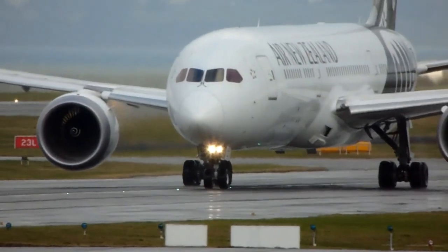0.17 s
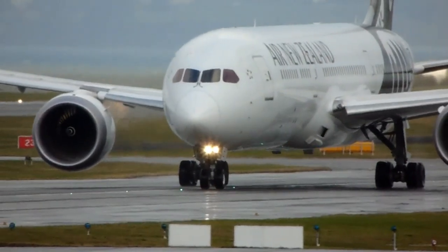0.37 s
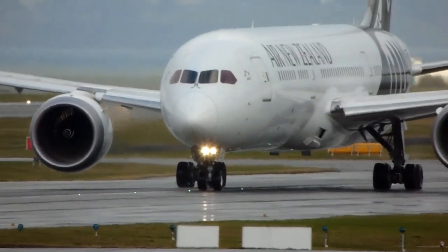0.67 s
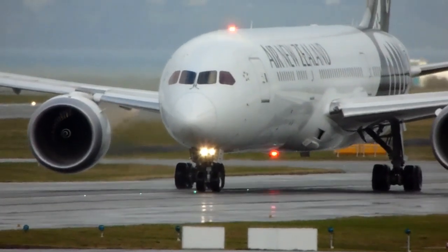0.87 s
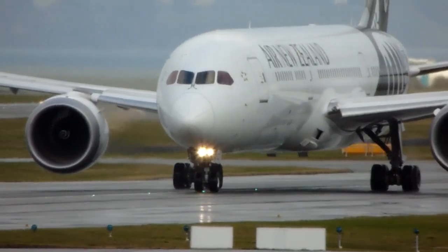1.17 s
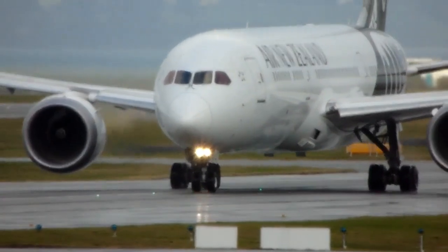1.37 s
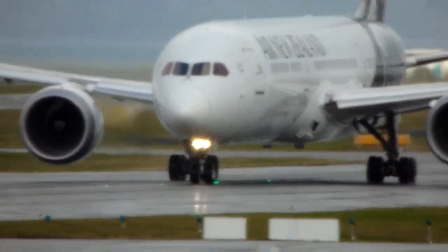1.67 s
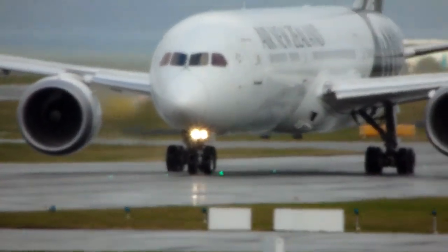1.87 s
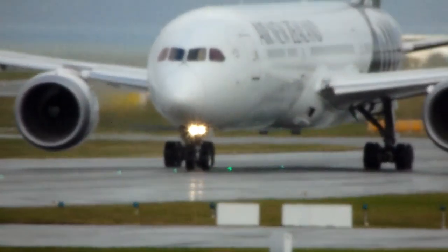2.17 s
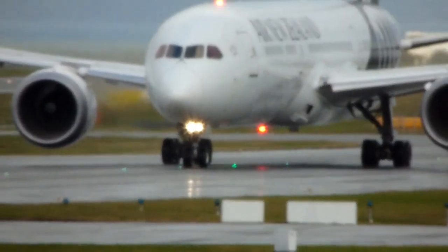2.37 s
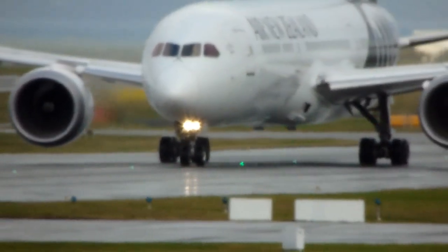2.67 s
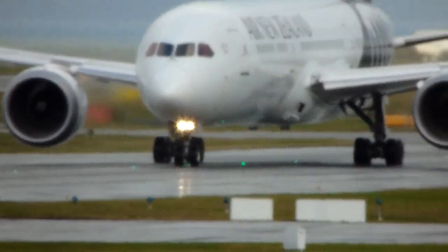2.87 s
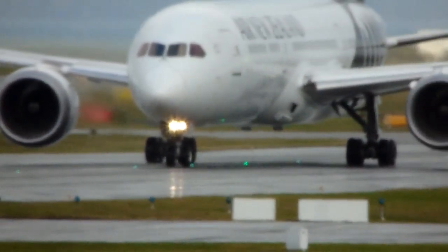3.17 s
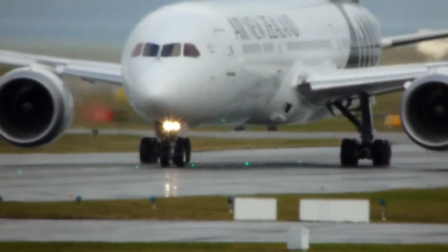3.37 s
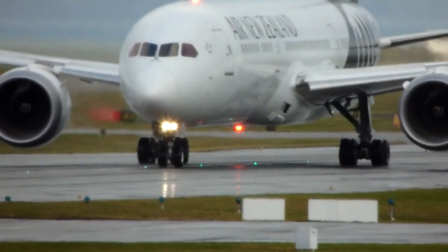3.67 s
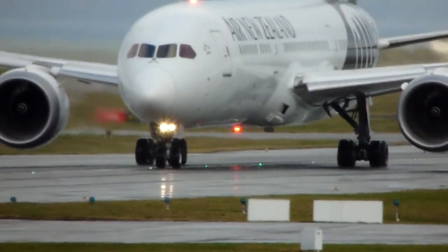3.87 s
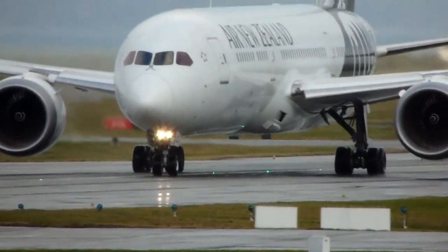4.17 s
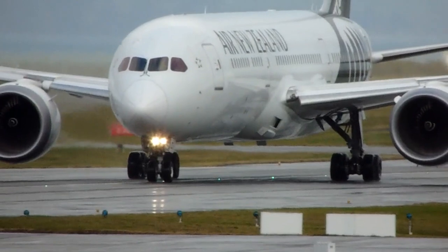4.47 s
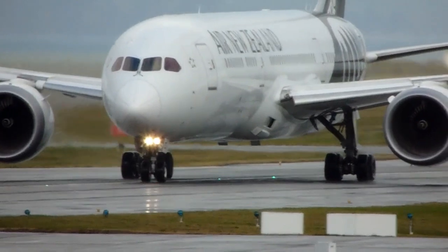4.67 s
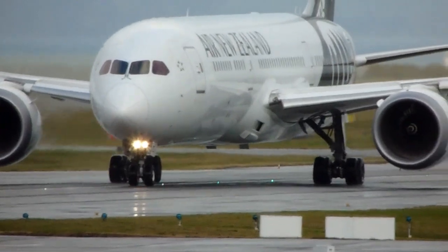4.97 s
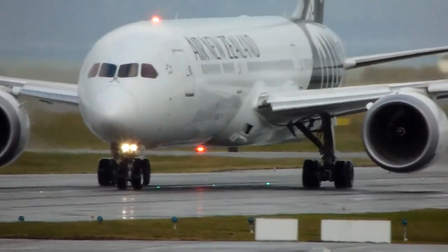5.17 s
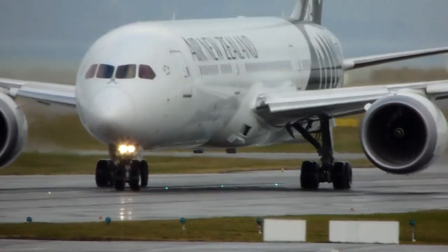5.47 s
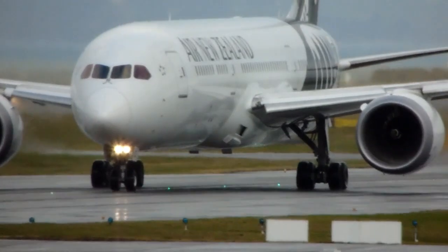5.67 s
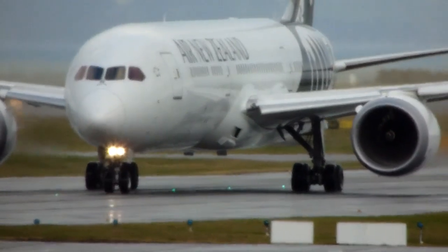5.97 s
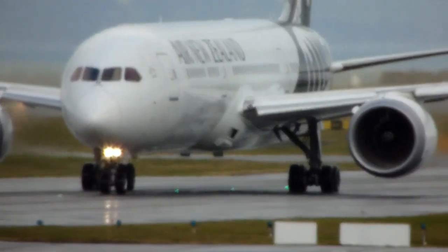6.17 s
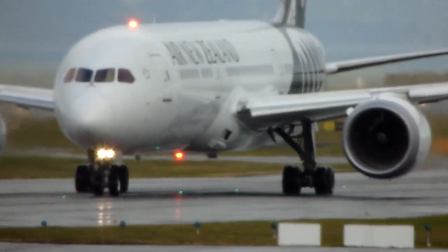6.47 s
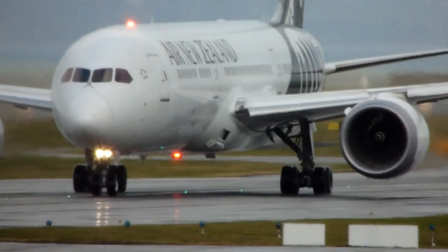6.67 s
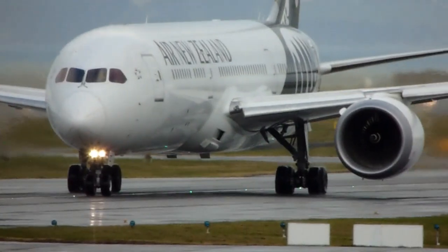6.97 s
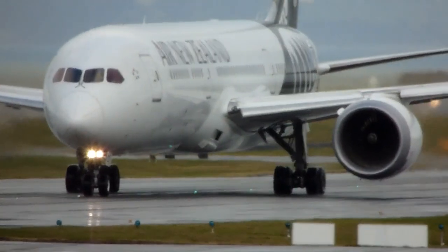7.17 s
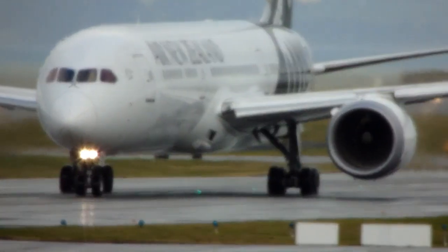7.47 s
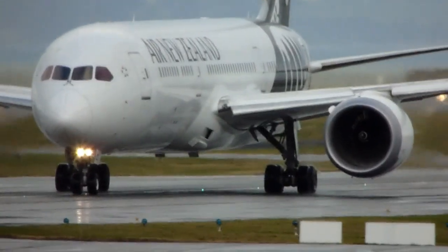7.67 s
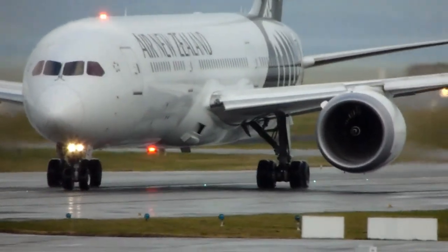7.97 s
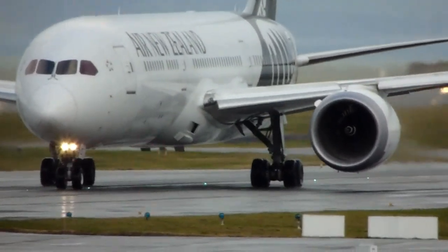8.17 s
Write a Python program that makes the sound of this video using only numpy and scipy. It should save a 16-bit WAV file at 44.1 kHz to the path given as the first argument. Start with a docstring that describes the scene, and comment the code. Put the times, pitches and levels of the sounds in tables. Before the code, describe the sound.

Airliner engines rush by in a fluttering hiss that peaks sharply, drops to a duller whining roar, and rises again amid dull wind thumps.

```python
"""A twin-engined airliner taxis past on a wet apron, heard in mono from the grass beside it.
First the nearer-turning intake swings through the line of sight: beamed noise swells from hiss to bright sizzle.
Then the second engine takes over with a lower, rasping whine: the same noise with other resonances and lobes.
Throughout, filtered noise makes the exhaust roar, a thin wash and a low breeze, while gusts and eddies
thump on the microphone, hardest in the middle and near the end."""
import sys
import numpy as np
from scipy import signal
from scipy.fft import rfft, irfft
from scipy.io import wavfile
from scipy.ndimage import uniform_filter1d, map_coordinates

SR = 44100
rng = np.random.default_rng(int(sys.argv[2]) if len(sys.argv) > 2 else 0)


def store_pcm(level_fs):
    """Save levels as 16-bit WAV."""
    pcm = np.round(np.clip(level_fs, -1, 1) * 32767).astype(np.int16)
    wavfile.write(sys.argv[1], SR, np.atleast_2d(pcm).T)


N = 367794
TIME = np.arange(N) / SR
FREQS = np.maximum(np.fft.rfftfreq(N, 1 / SR), 1)

# noise beamed out of the intakes, before flutter: (t/s, hiss level/dB, sizzle level/dB, top fizz level/dB)
INTAKE_BEAM = [(0.0, -39.5, -47.5, -62), (0.2, -36.5, -45, -60.5), (0.6, -35, -43.5, -56),
               (0.85, -31, -39, -51), (1.1, -32.5, -38, -53), (1.6, -30, -38.5, -47),
               (2.2, -28.5, -30, -41), (2.75, -30.5, -25, -36.5), (2.9, -30.5, -20.5, -32),
               (3.06, -31, -25, -30), (3.3, -37, -36.5, -46), (3.65, -39, -41, -49),
               (3.95, -43, -48.5, -59), (4.3, -42, -53.5, -74), (4.65, -43, -53, -76),
               (5.1, -42.5, -50.5, -75), (6.1, -41.5, -49, -70), (7.1, -38, -44.5, -62),
               (7.7, -35.5, -41, -58), (8.34, -37.5, -39, -56)]
LEAN_DB, LEAN_FOLLOWS = 0.33, 0.12   # brightness of the hiss: dB at the mean sizzle level; dB per dB of sizzle


def intake(air, scintillation_db, twinkle_db):
    """Short waves leave the intake in a narrow beam, so they swell and flutter most."""
    hiss_db, sizzle_db, fizz_db = in_time(INTAKE_BEAM)
    flutter_db = scintillation_db * drift(34) + twinkle_db * drift(3.1)

    # the dull and the bright half of the hiss trade places with the angle
    lean = from_db(LEAN_DB + LEAN_FOLLOWS * (sizzle_db - sizzle_db.mean()))
    dull = register(air, 3440, 4360)
    bright = register(air, 4690, 7030)
    hiss = (dull / lean + bright * lean) / np.sqrt(lean ** 2 + lean ** -2)

    hiss = wavering(hiss, hiss_db + 0.27 * flutter_db, flutter_db=0.85)
    sizzle = wavering(register(air, 6540, 10870), sizzle_db + flutter_db, flutter_db=0.22)
    fizz = wavering(register(air, 11500, 17000), fizz_db + flutter_db, flutter_db=1.0)
    return hiss + sizzle + fizz


# the fans' three registers as the aircraft turns past, before flutter:
# (t/s, low moan level/dB, whine level/dB, blade rasp level/dB)
FAN_REGISTERS = [(0.0, -41.5, -43, -38), (0.25, -40, -41, -39.5), (1.16, -40, -38.5, -40),
                 (1.62, -40.5, -40.5, -39), (2.14, -39, -39.5, -39.5), (2.95, -37.5, -38, -40),
                 (3.41, -38.5, -37, -41), (3.85, -39, -42.5, -46.5), (4.23, -40.5, -40, -41.5),
                 (4.7, -42, -46, -47), (4.98, -41.5, -43, -45.5), (5.6, -41.5, -44.3, -45.5),
                 (6.1, -41.5, -36, -44), (6.74, -41, -39, -38), (6.85, -40.5, -35.5, -37),
                 (8.2, -41, -34.5, -34.6), (8.34, -42, -32, -34)]
ROAR_DB, ROAR_FOLLOWS = -45.5, 1   # roar at the moan's mean level; share of the moan's swing it takes on


def fan_and_exhaust(air):
    """The dull jet roar under the fan's moan, whine and rasp, each a register of the engine noise."""
    moan_db, whine_db, rasp_db = in_time(FAN_REGISTERS)
    roar_db = ROAR_DB + ROAR_FOLLOWS * (moan_db - moan_db.mean())
    roar = wavering(register(air, 93, 734), roar_db, flutter_db=0.2)
    moan = wavering(register(air, 723, 1500), moan_db, flutter_db=0.55)
    whine = wavering(register(air, 1483, 2240), whine_db, flutter_db=1.0)
    rasp = wavering(register(air, 2364, 3256), rasp_db, flutter_db=0.95)
    return roar + moan + whine + rasp


# overall tilt of the engine noise, before its registers are levelled: (f/Hz, relative level/dB per Hz)
ENGINE_TILT = [(120, -1), (260, -4.5), (550, -0.5), (750, 0.5), (900, 4), (1400, 1), (1950, 6.5),
               (3100, 6.5), (4500, 5.5), (6500, -3), (9500, 0.5), (11000, -2), (14150, -15), (14400, -33)]


def engine_noise():
    """Turbulence from both engines, beamed through moving air and given its overall tilt; rms 1."""
    air = both_engines(handover_s=4.06, handover_length_s=0.65)
    return coloured(through_lobes(air), ENGINE_TILT)


# duct resonances, narrow peaks and hollows of each engine: (f/Hz, width/Hz, level/dB)
FIRST_DUCT = [(1200, 40, -1.5), (1257, 50, 3), (1600, 69, 1.5), (1760, 120, -1), (2840, 90, 2.5),
              (3360, 120, 3), (4360, 130, 3.5), (4770, 200, 2), (5470, 120, 2), (6930, 140, -4),
              (7160, 110, 2), (8100, 170, 4), (10750, 150, 0.5), (11900, 150, 2), (13000, 870, 1.5)]
SECOND_DUCT = [(835, 95, 4.5), (1255, 29, 1.5), (1480, 240, -0.5), (1606, 67, 1.5), (1907, 79, 5.5),
               (2200, 95, 0), (2640, 52, 3), (2886, 61, 4.5), (3670, 200, 3), (4040, 190, 1.5),
               (4480, 150, 5), (5300, 130, -3.5), (7000, 150, -4), (7300, 130, 1.5), (7460, 100, -7),
               (9940, 620, -0.5)]
# short echoes off cowling and wet ground that comb each engine's sound: (delay/s, signed gain)
FIRST_ECHOES = [(.0011, 0.01), (.001889, -0.025)]
SECOND_ECHOES = [(.001128, -0.11), (.001788, 0.092)]


def both_engines(handover_s, handover_length_s):
    """The second engine takes over as the first turns away, in an equal-power crossfade."""
    first = engine_air(FIRST_DUCT, FIRST_ECHOES, middle_s=1.6, sink_per_s=.007)
    second = engine_air(SECOND_DUCT, SECOND_ECHOES, middle_s=6.8, sink_per_s=.007)
    share = .5 + .5 * np.tanh((TIME - handover_s) / handover_length_s)
    return np.sqrt(1 - share) * first + np.sqrt(share) * second


# scatter off the airframe: spread in time, strength beside the direct sound
SCATTER_S, SCATTER_SHARE = .009, .18


def engine_air(modes, echoes, middle_s, sink_per_s):
    """Turbulence through duct resonances, echoes and airframe scatter; its pitch sinks slowly in passing."""
    shape_db = sum(db * np.exp(-2 * ((FREQS - hz) / width) ** 2) for hz, width, db in modes)
    comb = 1 + sum(gain * np.exp(-2j * np.pi * FREQS * delay) for delay, gain in echoes)

    # scatter builds up, then dies away; it is weaker below 3 kHz
    swell = (TIME / SCATTER_S) * np.exp(-np.minimum(2 * TIME / SCATTER_S, 20))
    scatter = rng.standard_normal(N) * swell
    scatter = scatter / np.linalg.norm(scatter)
    comb = comb + SCATTER_SHARE * rfft(scatter) * np.minimum(FREQS / 3000, 1)

    # twice the sample rate, so that the changing read speed stays clean
    fine = irfft(rfft(rng.standard_normal(N)) * from_db(shape_db) * comb, 2 * N)
    doppler = 1 - sink_per_s * (TIME - middle_s)
    return rms_one(map_coordinates(fine, [2 * np.cumsum(doppler)], order=3, mode="wrap"))


# lobes of each intake's beam, gliding in pitch as the angle changes: (t/s, centre f/Hz, lift level/dB)
FIRST_ROAR = [(1.0, 440, 1), (1.8, 410, 2.5), (2.5, 370, 3.2), (3.0, 360, 1.5)]
FIRST_MOAN = [(.3, 950, 1.7), (.8, 960, 2.5), (1.6, 990, 1), (2.2, 930, 0.91), (2.7, 900, 3.3),
              (3.2, 850, 2.1), (3.7, 825, 1.7)]
FIRST_HOWL = [(2.3, 1220, -1), (2.65, 1250, 4), (2.9, 1260, 5.5), (3.15, 1280, 5.5), (3.4, 1320, 4),
              (3.7, 1240, 2)]
FIRST_SWEEP = [(1.6, 2600, -2.5), (2.1, 2360, 7.5), (2.6, 2250, 2), (2.9, 1800, -1.5), (3.2, 1710, 4),
               (3.4, 1640, 6.5), (3.75, 1560, 1)]
FIRST_HISS = [(.7, 4200, 1), (1.3, 4270, 0.5), (2.2, 4700, -2.5), (2.38, 4800, 2), (3.0, 4430, -2)]
FIRST_WHISTLE = [(0, 9050, 1), (1.0, 9150, 3), (1.6, 9800, 5.6), (2.1, 11100, 6.4), (2.4, 11700, 3.3),
                 (3.1, 11000, 1), (3.65, 9960, 8), (4.0, 9900, 1.5)]
SECOND_WHINE = [(3.2, 2200, 1), (3.55, 2190, 6), (3.9, 2050, 3.5), (4.3, 2010, 4), (4.7, 1940, 3.5),
                (4.97, 1970, 6), (5.2, 2030, 4), (5.5, 1900, 2), (5.9, 1930, 0), (6.15, 2200, 2),
                (6.7, 2800, 2), (7.1, 2590, 3.5), (8.3, 2400, 0)]
SECOND_WHISTLE = [(3.9, 4140, -2), (4.25, 3850, 3), (4.55, 3930, 1), (4.9, 3550, 3), (5.5, 3800, 1),
                  (5.85, 4150, -3), (6.3, 4650, 4), (6.55, 4850, 3.5), (6.9, 4900, -4)]


def through_lobes(air):
    """As the aircraft rolls on, the lobes of its beams sweep past, and the moving air colours the noise."""
    hz, s, frames = signal.stft(air, SR, nperseg=2048)
    lift_db = lobe(FIRST_ROAR, hz, s, width=0.29, gap=.4)
    lift_db += lobe(FIRST_MOAN, hz, s, width=0.12, gap=0.36)
    lift_db += lobe(FIRST_HOWL, hz, s, width=0.12, gap=0.69)
    lift_db += lobe(FIRST_SWEEP, hz, s, width=0.068, gap=0.47)
    lift_db += lobe(FIRST_HISS, hz, s, width=0.22, gap=0.21)
    lift_db += lobe(FIRST_WHISTLE, hz, s, width=0.092, gap=0.28)
    lift_db += lobe(SECOND_WHINE, hz, s, width=0.058, gap=0.3)
    lift_db += lobe(SECOND_WHISTLE, hz, s, width=0.085, gap=0.67)
    lift_db += surges(hz, s) + shimmer(frames.shape, depth_db=1.3)
    return signal.istft(frames * from_db(lift_db), SR)[1][:N]


LOBE_FADE_S = .16   # a lobe dies away this fast beyond its path
LOBE_WANDER = 0.015   # the moving air shifts a lobe's centre by this share (rms)


def lobe(path, hz, s, width, gap):
    """Lift in dB of one gliding, wandering lobe with gaps on either side; width is a share of its centre."""
    times, centres, lifts = np.transpose(path)
    wander = 1 + LOBE_WANDER * np.interp(s, TIME, drift(5))
    centre = np.interp(s, times, centres) * wander
    present = np.exp(-((s - np.clip(s, times[0], times[-1])) / LOBE_FADE_S) ** 2)
    off = (hz[:, None] / centre - 1) / width
    profile = (1 - gap * off ** 2) * np.exp(-.5 * off ** 2)
    return present * np.interp(s, times, lifts) * profile


# the moving air carries parts of the beam over in short surges and fades:
# (t/s, level/dB, half length/s, centre f/Hz)
AIR_SURGES = [(.55, -1.5, .045, 9000), (0.696, 6, 0.045, 9500), (0.907, 11, 0.078, 9500),
              (0.922, 3, 0.11, 2800), (1.18, 2.5, .04, 4600), (1.35, 0.5, 0.056, 4600),
              (1.422, 3.5, 0.027, 12000), (1.617, 0, .035, 10000), (1.85, 5.5, 0.056, 8000),
              (2, -6.5, 0.065, 11000), (2.06, 2, 0.016, 2700), (2.213, -2, 0.025, 4000),
              (2.338, -2.5, .025, 9000), (2.482, 2.5, 0.053, 6750), (2.508, 2.5, 0.036, 13000),
              (2.668, -5.5, 0.013, 9100), (2.718, 3.5, 0.024, 9100), (2.85, 0.5, .04, 9500),
              (3, -2.5, 0.023, 10000), (3.062, 2, 0.022, 9000), (3.174, 2.5, 0.027, 1100),
              (3.36, 0, 0.042, 1700), (3.408, 3.5, 0.027, 6000), (3.54, -2, 0.043, 8000),
              (3.74, 1, 0.068, 10500), (4.102, 5, .07, 7000), (4.247, 3.5, 0.04, 4500),
              (4.515, 2, .05, 4500), (4.72, -2.5, 0.092, 4500), (4.98, 1, .06, 2000), (5.837, 4, .05, 4000),
              (5.92, 5.5, 0.04, 8000), (6.19, 0, .12, 2000), (6.3, -1.8, 0.055, 4000),
              (6.596, 4, 0.1, 8000), (6.6, 1, 0.093, 4200), (6.93, 3, 0.023, 8000),
              (7.056, -4.5, .045, 8000), (7.24, 1, 0.044, 4200), (7.505, 3, 0.052, 8200),
              (7.6, -2, 0.072, 2900), (7.68, 2, 0.037, 5330), (8.06, -2.5, .06, 5500),
              (8.247, 1.5, 0.033, 11000), (8.33, 4.5, 0.043, 4200)]
SURGE_OCTAVES = 0.46   # half width of a surge's reach in pitch


def surges(hz, s):
    """Lift in dB of the surges, each a smooth swell in time and in pitch."""
    octave = np.log2(np.maximum(hz, 1))[:, None]
    lift_db = 0
    for at, db, length, centre in AIR_SURGES:
        in_pitch = bump(octave, np.log2(centre), SURGE_OCTAVES)
        lift_db = lift_db + db * in_pitch * bump(s, at, length)
    return lift_db


def shimmer(shape, depth_db):
    """Paths through uneven air interfere: narrow bands brighten and fade by chance, more so in the treble."""
    field = rng.standard_normal(shape)
    for _ in range(2):
        field = uniform_filter1d(field, size=7, axis=0)    # across pitch
        field = uniform_filter1d(field, size=18, axis=1)   # across time
    return depth_db * rms_one(field) * np.linspace(.5, 2, shape[0])[:, None]


def wavering(sound, level_db, flutter_db):
    """Sound flutters in the moving air on its way."""
    return sound * from_db(level_db + flutter_db * drift(4.5))


# the strongest eddies that slap the microphone: (t/s, peak level/dB, pitch f/Hz)
MIC_EDDIES = [(.067, -23, 80), (0.099, -21.5, 70), (.508, -24.5, 130), (0.746, -30, 84), (2.436, -28, 137),
              (2.681, -29, 60), (3.681, -21, 216), (3.817, -27, 120), (3.837, -16.5, 100),
              (3.848, -11, 342), (3.854, -12, 230), (3.863, -16, 141), (3.878, -15, 175),
              (4.411, -23.5, 147), (4.611, -22.5, 245), (4.624, -21.5, 160), (4.649, -26, 110),
              (4.759, -22, 340), (4.763, -18, 160), (4.778, -24, 110), (4.802, -16.5, 100),
              (4.834, -23, 130), (4.85, -17.5, 270), (4.855, -12, 189), (4.863, -24, 170),
              (4.882, -16, 164), (4.897, -10.5, 76.5), (5.197, -20.5, 117), (7.573, -30, 200),
              (7.584, -21, 58), (7.615, -29, 70), (7.965, -26, 140), (7.99, -18, 105), (8.001, -23, 70),
              (8.021, -8, 161), (8.047, -19, 170)]
WAKE_S, WAKE_LOSS_DB = 0.01076, 16   # two weaker eddies follow: mean spacing; loss from one to the next
BODY_DB, BODY_PITCH_SHARE = -18, 0.46   # slower swirl round an eddy: level below its slap; share of its pitch


def thumps():
    """Each eddy pushes and pulls once inside a slower, lower swirl, then sheds weaker ones of scattered pitch."""
    out = np.zeros(N)
    chances = rng.uniform(.6, 1.4, (len(MIC_EDDIES), 2, 2))
    for (s, db, hz), chance in zip(MIC_EDDIES, chances):
        slaps = [(s, db, hz), (s, db + BODY_DB, hz * BODY_PITCH_SHARE)]
        for k, (late, size) in enumerate(chance, 1):
            slaps.append((s + k * WAKE_S * late, db - k * WAKE_LOSS_DB, hz * size))
        for at, peak_db, pitch in slaps:
            near = np.abs(TIME - at) < 2 / pitch
            passage = 2 * np.pi * pitch * (TIME[near] - at)
            slap = np.sin(passage) * np.exp(-.5 * (passage / 1.6) ** 2)
            out[near] += from_db(peak_db) * slap / slap.max()
    return out


# gusts that churn round the microphone, before the offsets below: (t/s, level/dB, half length/s)
MIC_GUSTS = [(0.1, -40, 0.024), (.5, -43, 0.026), (0.737, -41.5, .035), (1.615, -42, 0.022),
             (1.74, -41, .025), (2.05, -35, 0.053), (2.223, -38, 0.053), (2.426, -36, 0.047),
             (2.554, -44, 0.028), (2.68, -36, 0.048), (3.65, -38, 0.16), (3.848, -28, 0.035),
             (4.624, -40, 0.05), (4.772, -31.5, 0.031), (4.876, -31.5, 0.022), (5.21, -42, 0.033),
             (5.478, -44, 0.037), (5.634, -43, 0.034), (6.12, -42, 0.095), (7.21, -49, 0.023),
             (7.45, -40, 0.07), (7.593, -34.5, 0.037), (8.014, -29.5, 0.045)]
# spectra of the wind's sway and rumble: (f/Hz, relative level/dB per Hz)
SWAY_SPECTRUM = [(6, -3), (11, 2), (17, 4.5), (24, 3), (38, -14), (52, -4), (75, -37), (150, -51)]
RUMBLE_SPECTRUM = [(35, -32), (65, 1.5), (95, 1.5), (120, -1.5), (160, 2), (230, -7.5), (330, -9),
                   (600, -23)]
SWAY_DB, RUMBLE_DB = -43.5, -44   # steady breeze, before its lumps
GUST_SWAY_DB = 6.5   # added to a gust's level for its slow push
GUST_LENGTH_S, LONG_GUST_LOSS_DB = 0.022, 2   # usual half length; rumble lost per doubling of it


def wind(lumpy_db):
    """Pressure sways and rumbles at the microphone; gusts stir up both, and long ones mostly sway."""
    push = churn = 0
    for s, db, length in MIC_GUSTS:
        swell = bump(TIME, s, length)
        churn_db = db - LONG_GUST_LOSS_DB * np.log2(length / GUST_LENGTH_S)
        push = push + from_db(db + GUST_SWAY_DB) * swell
        churn = churn + from_db(churn_db) * swell

    # breeze and gusts add in power
    sway = np.hypot(from_db(SWAY_DB + lumpy_db * drift(3.3)), push)
    rumble = np.hypot(from_db(RUMBLE_DB + 0.61 * lumpy_db * drift(6.3)), churn)
    swaying = sway * coloured(rng.standard_normal(N), SWAY_SPECTRUM)
    rumbling = rumble * coloured(rng.standard_normal(N), RUMBLE_SPECTRUM)
    return swaying + rumbling


# thin steady wash of the whole apron: (f/Hz, relative level/dB per Hz)
WASH_SPECTRUM = [(3000, 4), (9000, -4), (12000, -9), (14100, -9), (14400, -24)]


def apron_wash(level_db):
    """Steady treble noise behind everything."""
    return from_db(level_db) * coloured(rng.standard_normal(N), WASH_SPECTRUM)


def from_db(db):
    """Decibels to gain."""
    return 10 ** (np.asarray(db) / 20)


def rms_one(x):
    """Scale to unit power."""
    return x / np.sqrt(np.mean(x ** 2) + 1e-20)


def in_time(rows):
    """Each column of a curve table at every sample."""
    s, *columns = np.transpose(rows)
    return [np.interp(TIME, s, c) for c in columns]


def bump(x, middle, half_length):
    """A smooth swell of height 1 around a middle."""
    return np.exp(-.5 * ((x - middle) / half_length) ** 2)


def drift(rate):
    """Slow chance with about this many turns a second; rms 1."""
    return rms_one(irfft(rfft(rng.standard_normal(N)) / (1 + (FREQS / rate) ** 2), N))


def coloured(noise, spectrum):
    """Noise shaped by a spectrum that falls 40 dB an octave beyond its ends; rms 1."""
    hz, db = np.transpose(spectrum)
    octaves_outside = np.abs(np.log2(FREQS / np.clip(FREQS, hz[0], hz[-1])))
    shape_db = np.interp(np.log(FREQS), np.log(hz), db) - 40 * octaves_outside
    return rms_one(irfft(rfft(noise) * from_db(shape_db), N))


def register(air, low_hz, high_hz):
    """One register of the engine noise, with soft edges that join its neighbours; rms 1."""
    steepness = 16
    low_edge = 1 + (low_hz / FREQS) ** steepness
    high_edge = 1 + (FREQS / high_hz) ** steepness
    return rms_one(irfft(rfft(air) / low_edge / high_edge, N))


def scene():
    """Engines, thumps, wind and wash, alike in both channels."""
    air = engine_noise()
    engines = intake(air, scintillation_db=0.78, twinkle_db=1.46) + fan_and_exhaust(air)
    mono = engines + thumps() + wind(lumpy_db=2.5) + apron_wash(level_db=-57.5)
    return np.array([mono, mono])


CUTOFF_HZ = 15000


def record(dry):
    """Cut the top steeply with an elliptic low-pass."""
    low_pass = signal.ellip(10, .1, 90, CUTOFF_HZ, fs=SR, output="sos")   # ripple, stop depth in dB
    return signal.sosfilt(low_pass, dry)


dry = scene()
out = record(dry)
store_pcm(out)
```